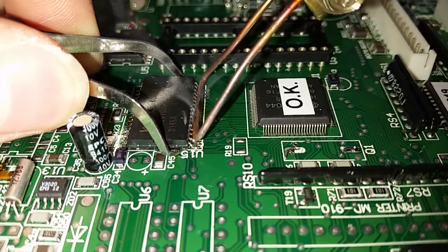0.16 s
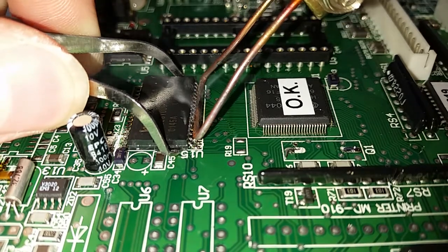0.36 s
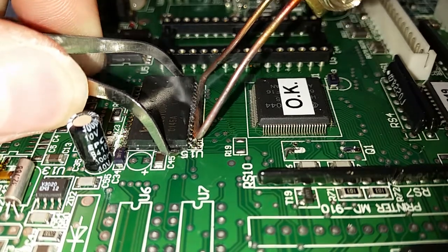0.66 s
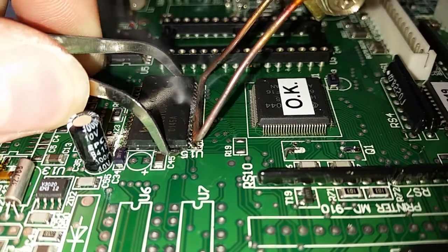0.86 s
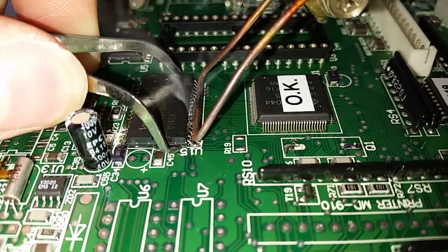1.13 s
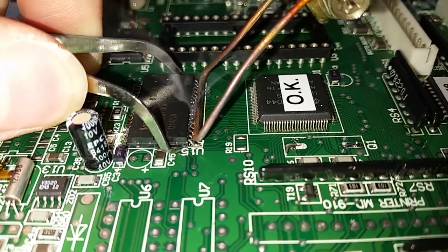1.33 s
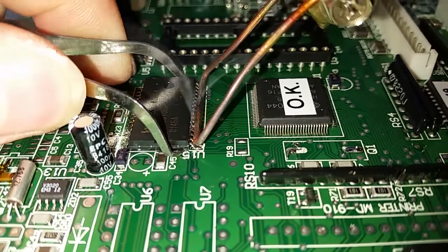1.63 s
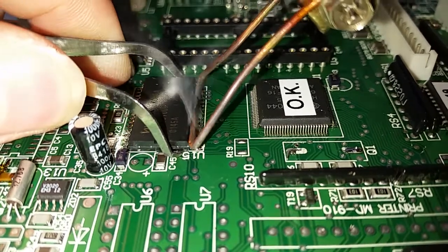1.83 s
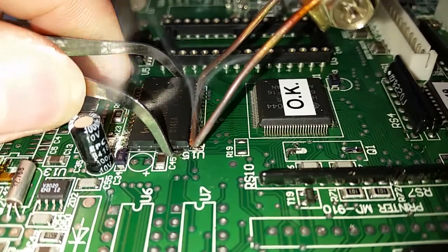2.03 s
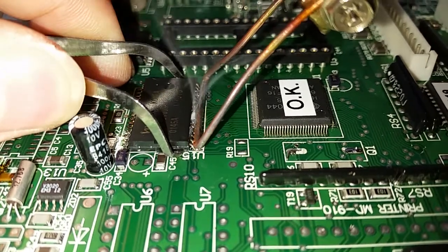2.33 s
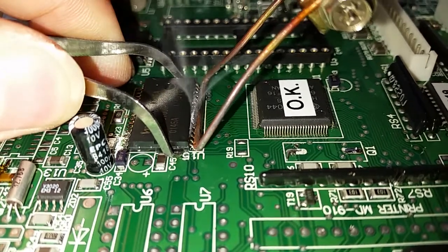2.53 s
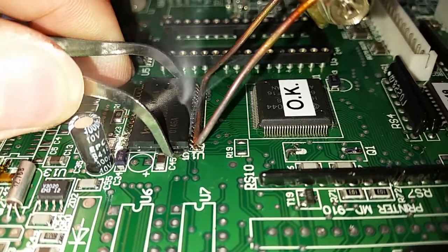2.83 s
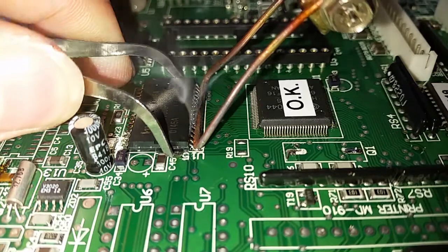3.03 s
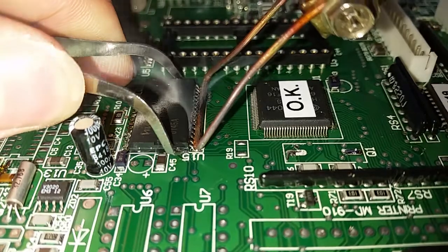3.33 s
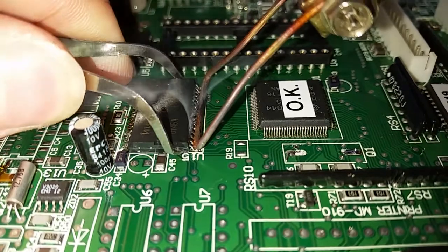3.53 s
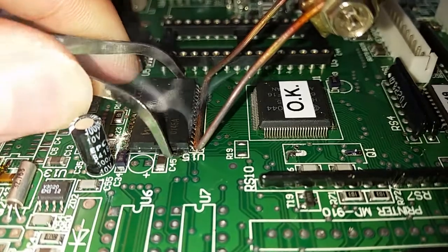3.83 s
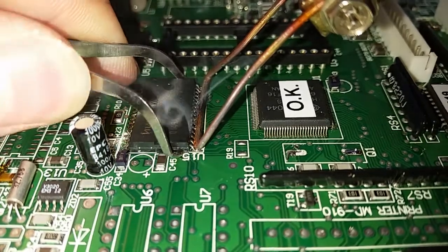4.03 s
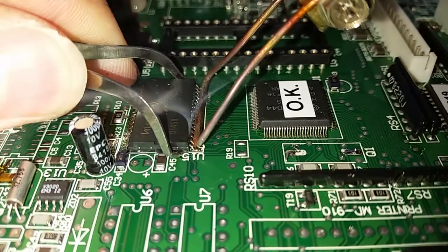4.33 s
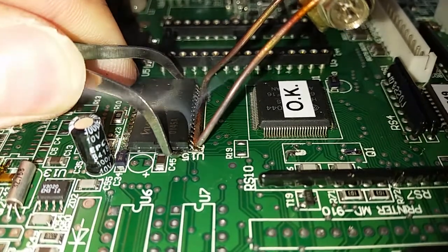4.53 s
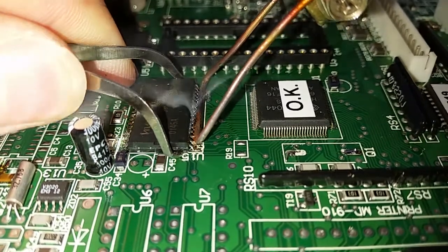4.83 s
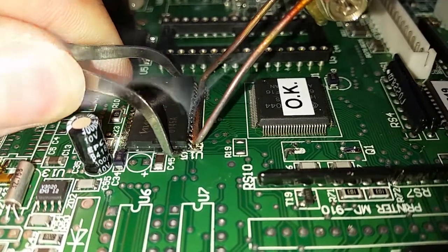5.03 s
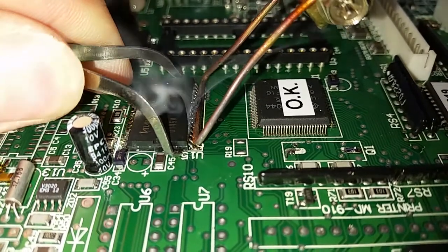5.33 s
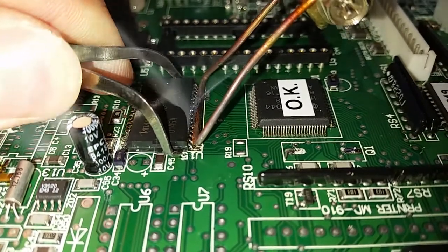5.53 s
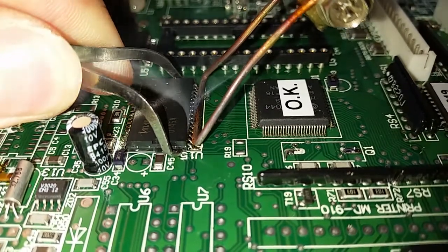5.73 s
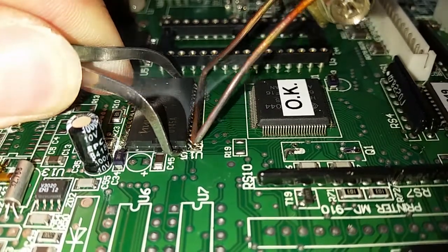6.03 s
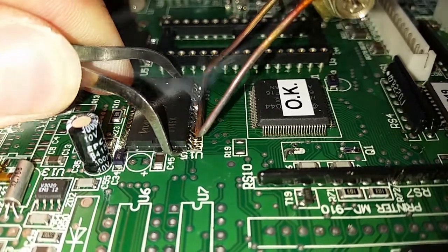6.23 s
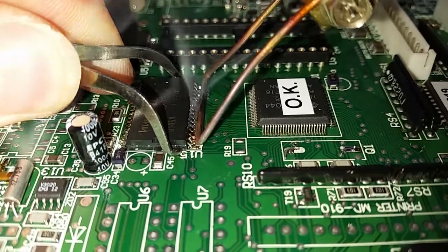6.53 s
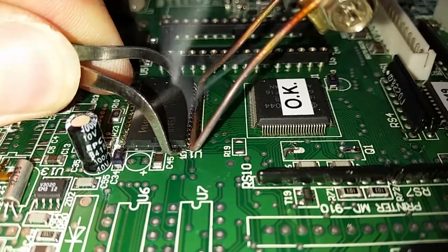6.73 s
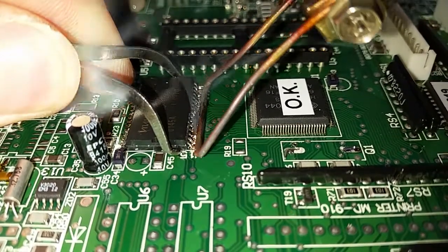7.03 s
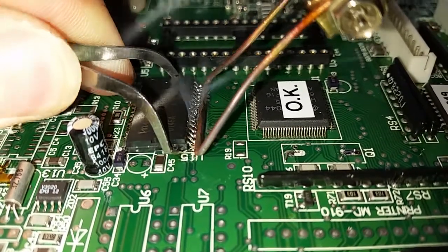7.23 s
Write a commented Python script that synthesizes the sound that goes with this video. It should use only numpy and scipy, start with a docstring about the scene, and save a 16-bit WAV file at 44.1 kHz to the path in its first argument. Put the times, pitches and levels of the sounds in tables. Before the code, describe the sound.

A phone lying beside the work picks up soldering in stereo, the thumps heavier on the right over faint hiss. Gritty scrapes and taps come first, then a short squeak, dry crackling and bright pops of flux. Two strong knocks mark the middle; later a wavering low hum grows, the crackle thins, and a sharp switch click closes the work.

```python
"""A workbench in a small room: a soldering gun heats the pins of a chip on a circuit board, a hand's width
from a phone on the same bench. Flux sizzles and spits as flurries of random clicks and noise, the tip scrapes
and squeaks along the pins, and knocks ring the board's modes over a low, wandering hum. The bench carries
thumps mostly into the right microphone, which also has a hiss of its own."""
import sys
import numpy as np
from scipy import signal
from scipy.fft import rfft, irfft
from scipy.io import wavfile

SR = 44100
rng = np.random.default_rng(int(sys.argv[2]) if len(sys.argv) > 2 else 0)


def dump_mix(stems):
    """Bounce the given channels to the path in sys.argv[1] as a 16-bit WAV at rate SR."""
    frames = np.atleast_2d(stems).T  # one column per channel
    limited = np.clip(frames, -1, 1)  # hard clip at full scale
    pcm = np.round(limited * 32767).astype(np.int16)
    wavfile.write(sys.argv[1], SR, pcm)


N = 325308
TIME = np.arange(N) / SR


def undb(db):
    """Decibels to gain."""
    return 10 ** (np.asarray(db) / 20)


def unit(x):
    """Scale to rms 1."""
    return x / np.sqrt(np.mean(x ** 2))


def add(track, s, sound):
    """Mix a sound into a track from time s."""
    i = max(int(s * SR), 0)
    part = sound[:max(N - i, 0)]
    track[i:i + len(part)] += part


def convolve(x, response):
    """Pass a sound through a left and a right response."""
    return signal.fftconvolve(np.atleast_2d(x), response, axes=1)[:, :N]


def colour(rows, size=4096):
    """Minimum-phase left and right responses from (frequency [Hz], left [dB], right [dB]) rows."""
    hz, *sides = np.transpose(rows)
    log_hz = np.log(np.maximum(np.fft.rfftfreq(size, 1 / SR), 1))
    log_gains = [np.log(undb(np.interp(log_hz, np.log(hz), db))) for db in sides]
    cepstrum = irfft(log_gains)
    # folding the cepstrum forward in time makes the response causal
    cepstrum[:, 1:size // 2] *= 2
    cepstrum[:, size // 2 + 1:] = 0
    return irfft(np.exp(rfft(cepstrum)))


def ring(modes, stiffness=1):
    """Left and right impulse responses of damped modes, peak 1; stiffness scales their pitch."""
    t = TIME[:SR // 4]
    out = np.zeros((2, len(t)))
    for k, (hz, width, left, right) in enumerate(modes):
        decay = width * np.exp(-np.pi * width * t)
        # neighbouring modes start in opposite directions
        out += undb([[left], [right]]) * decay * np.sin(2 * np.pi * stiffness * hz * t + k * np.pi)
    return out / np.abs(out).max()


def band_noise(low_hz, high_hz, order=2):
    """Noise between two frequencies, rms 1."""
    band = signal.butter(order, [low_hz, high_hz], "band", fs=SR, output="sos")
    return unit(signal.sosfilt(band, rng.standard_normal(N)))


def walk(rate):
    """Random wavering around 0, spread near 1: rate new values a second, joined by straight lines."""
    step = int(SR / rate)
    count = N // step + 2
    return np.interp(TIME, np.arange(count) * step / SR, rng.standard_normal(count))


def grains(rate, spread_db):
    """Random clicks, many small and a few large, rms 1."""
    when, size, sign = rng.random((3, N))
    gain = undb(-spread_db * np.log(np.maximum(size, .02)))
    return unit((when < rate / SR) * gain * np.sign(sign - .5))


def ticks(rate, spread_db):
    """Sparse clicks at random times, each 0 to twice spread_db above gain 1."""
    when, size = rng.random((2, N))
    return (when < rate / SR) * undb(spread_db * 2 * size)


def scatter(clicks, t60, db, channels=2):
    """Each click is followed by its own brief, fading spray of noise."""
    decay = np.exp(-2 * np.log(1000) * TIME[:4096] / t60)
    energy = np.abs(signal.fftconvolve(clicks ** 2, decay / decay.sum())[:len(clicks)])
    return clicks + undb(db) * np.sqrt(energy) * rng.standard_normal((channels, len(clicks)))


def tail(t60, db, size=16384):
    """A direct sound followed by dense reflections, different at each microphone."""
    noise = rng.standard_normal((2, size)) * np.exp(-np.log(1000) * TIME[:size] / t60)
    out = undb(db) * noise / np.sqrt(np.sum(noise ** 2, axis=1, keepdims=True))
    out[:, 0] += 1
    return out


def spell(start, length, rise_db_per_s, fall_db_per_s):
    """Gain that rises to 1, holds for a length of time and falls."""
    before = np.maximum(start - TIME, 0)
    after = np.maximum(TIME - start - length, 0)
    return undb(-rise_db_per_s * before - fall_db_per_s * after)


# colour of the steady room air and microphone hiss:
# (frequency [Hz], relative level at left [dB], relative level at right [dB])
AIR_COLOUR = [(29.8, -12, 3), (100, 0.5, -9.5), (320, -6.5, -6), (610, -13, -20), (1334, -19.5, -12.5),
              (1750, -25, -25.5), (3170, -21.5, -10.5), (3370, -22.5, -2), (3920, -16.5, 1.5),
              (4476, -25.5, -10), (5300, -32, -31.5), (5900, -38.5, -44.5), (14400, -36.5, -31),
              (15100, -71, -57)]
# hands on the bench: relative level [dB] and its wavering [dB]
RUMBLE_DB, RUMBLE_WAVER_DB = -51.5, 3.5
SHUFFLE_S = 0.682  # the rumble is full from the start of the shuffle


def background():
    """Room air and microphone hiss; the rumble of hands comes through the bench, mainly on the right."""
    air = unit(convolve(rng.standard_normal((2, N)), colour(AIR_COLOUR))) * undb(-54.0)
    rumble = np.array([band_noise(30, 135.0) for _ in range(2)]) * undb(2. * walk(15))
    onset = spell(SHUFFLE_S, N / SR, rise_db_per_s=117, fall_db_per_s=0)
    resting = undb(RUMBLE_DB + RUMBLE_WAVER_DB * walk(2.627)) * onset
    return air + undb([[-8.], [0.5]]) * resting * rumble


# the hum swells, sags in pitch and dips briefly: (time [s], mean pitch [Hz], relative level [dB])
HUM_COURSE = [(0, 60.24, -87), (4.4, 60.4, -59.5), (4.95, 59.94, -48), (5.3, 58.95, -52.5),
              (5.6, 59.65, -50.5), (6.101, 58.77, -47.5), (6.72, 57.04, -50), (6.8, 57.3, -48.5),
              (6.88, 56.85, -47.5), (7.38, 57.4, -49.5)]
# partials of the hum: (multiple of the pitch, relative level [dB], wavering [dB])
HUM_PARTIALS = [(1, -2, 1), (2, -11, 5.5), (3, -16.5, 5)]
# faint wavering tones, long or brief, one of them the short ring of a soft bump:
# (start [s], length [s], mean frequency [Hz], relative level [dB])
WAVERING_TONES = [(1.996, 1.7, 100, -57), (4.1, 3.3, 255.5, -63), (6.14, 0.15, 1185, -73.5),
                  (6.534, 0.073, 315, -51.5), (6.6, 0.7, 169.9, -53)]
HUM_WANDER = 0.022  # pitch wander as a fraction of the pitch


def hum():
    """A low hum of sine partials, a few faint wavering tones and a whirr of noise that swells with the hum."""
    s, pitch_hz, level_db = np.transpose(HUM_COURSE)
    swell = undb(np.interp(TIME, s, level_db))
    wandering_hz = np.interp(TIME, s, pitch_hz) * (1 + HUM_WANDER * walk(8.6))
    phase = 2 * np.pi * np.cumsum(wandering_hz) / SR
    tones = np.zeros(N)
    for k, order_db, waver_db in HUM_PARTIALS:
        tones += swell * undb(order_db + waver_db * walk(10.5)) * np.sin(k * phase)
    for start, length, tone_hz, tone_db in WAVERING_TONES:
        n = int(length * SR)
        drift = 1.57 * walk(14.0)  # radians
        tone = undb(tone_db + 2. * walk(10.44)) * np.sin(2 * np.pi * tone_hz * TIME + drift)
        add(tones, start, signal.windows.tukey(n, .4) * tone[:n])
    whirr = np.array([band_noise(120, 332, order=2) for _ in range(2)])
    whirr_level = undb(-6.5 + 2.1 * walk(13)) * swell
    return np.sqrt(2) * undb([[1.], [-2.]]) * tones + whirr_level * whirr


# attack [s], relative level [dB], hold [s] and fade [dB/s] of the shuffle
SHUFFLE_ATTACK_S, SHUFFLE_DB, SHUFFLE_HOLD_S, SHUFFLE_FADE_DB_PER_S = 0.0054, -41, 0.11, 19


def shuffle():
    """An abrupt scuff, alike at both microphones, dulls in rough jerks into a rumble that fades away."""
    since = np.maximum(TIME - SHUFFLE_S, 0)
    attack = np.minimum(since / SHUFFLE_ATTACK_S, 1)
    level = undb(SHUFFLE_DB) * attack * spell(SHUFFLE_S, SHUFFLE_HOLD_S, 0, SHUFFLE_FADE_DB_PER_S)
    scuff = band_noise(100, 400, order=3) * np.exp(-since / 0.076) * undb(-6 + 5.1 * walk(58.5))
    rumble = np.array([band_noise(50, 95.5) for _ in range(2)])
    return level * (rumble + scuff)


# the trigger's time [s], room decay [s] and relative level at each microphone [dB]
TRIGGER_S, TRIGGER_T60_S, TRIGGER_LEFT_DB, TRIGGER_RIGHT_DB = 7.144, 0.21, -34.5, -35


def trigger():
    """The switch of the gun snaps; the microphones get it as a decaying burst of noise from the room."""
    snap = np.zeros(N)
    since = TIME[:SR // 3]
    add(snap, TRIGGER_S, (1 - np.exp(-since / 0.0046)) * np.exp(-np.log(1000) * since / TRIGGER_T60_S))
    echo = np.array([band_noise(580, 2600, order=1) for _ in range(2)])
    echo = signal.sosfilt(signal.butter(8, 13500, fs=SR, output="sos"), echo)
    return undb([[TRIGGER_LEFT_DB], [TRIGGER_RIGHT_DB]]) * snap * echo


# squeaks of the tip: (time [s], length [s], first pitch [Hz], last pitch [Hz], relative level [dB])
TIP_SQUEAKS = [(1.681, 0.0286, 1029, 1123, -22), (1.69, 0.04, 1565, 1543, -26),
               (6.06, 0.035, 1630, 1950, -40)]
# colour of a burst at the tip, also used by the scrapes and the bright snaps:
# (frequency [Hz], left level [dB], right level [dB])
TIP_COLOUR = [(297, -10.5, -4.5), (1000, -10.5, -11), (1758, -19.5, -27.5), (4560, -7, -30),
              (5800, -13, -21), (8500, -16, -16.5), (8820, -12.5, -5), (10600, -26, -4), (11560, -6, 1),
              (12450, -13, 0), (13900, -15.5, -9), (14500, -10, -13), (15300, -65, -30)]
# stiffer modes of the board, also rung by scrapes and knocks:
# (frequency [Hz], bandwidth [Hz], relative level at left [dB], relative level at right [dB])
STIFF_MODES = [(780, 37, 5.5, 12.5), (870, 106, 3, 7), (965, 76, 7.5, 11.5), (1081, 202, 7.5, 5),
               (1303, 68, 0, 8.5), (1826, 340, 3, 1), (2410, 50, 8, 2.5), (2800, 158, 5, -3.5)]


def squeaks():
    """The slips fall roughly into step and the tip sings through the board, with a row of overtones."""
    out = np.zeros(N)
    for s, length, first_hz, last_hz, db in TIP_SQUEAKS:
        n = int(length * SR)
        glide_hz = np.linspace(first_hz, last_hz, n) * (1 + 0.06 * walk(1500)[:n])
        phase = 2 * np.pi * np.cumsum(glide_hz) / SR
        overtones = sum(np.sin(k * phase) / k ** 1.3 for k in range(1, 8))
        add(out, s, undb(db) * signal.windows.tukey(n, .5) * overtones)
    return undb(1.0) * convolve(out, colour(TIP_COLOUR)) + undb(-43.0) * convolve(out, ring(STIFF_MODES))


# the tip dragged over the pins: (time [s], length [s], relative body level [dB],
# relative treble level [dB], pitch ratio of the bend)
PIN_SCRAPES = [(0, 0.055, -54, -61, 1.1), (0.042, 0.11, -47.5, -48.5, 0.96),
               (0.164, 0.035, -42.5, -40.5, 1.1), (0.209, 0.036, -41, -47.5, 1.04),
               (0.238, 0.032, -46.5, -43.5, 1), (0.956, 0.045, -45.5, -50, 1.06),
               (1.258, 0.041, -49, -57, 1), (1.672, 0.042, -39.5, -34, 1.11), (2.395, 0.031, -52.5, -70, 1),
               (2.61, 0.072, -43.5, -59, 1.04), (2.684, 0.053, -52.5, -48.5, 1.02),
               (2.784, 0.039, -48, -69, 1), (3.049, 0.09, -52.5, -85, 1.16),
               (4.205, 0.031, -40, -39.5, 1.17), (6.08, 0.028, -52.5, -64, 1.2), (6.87, 0.024, -54, -86, 1)]
# between strokes the tip nudges the pins: (time [s], relative level [dB])
PIN_NUDGES = [(1.176, -43), (1.427, -41.5), (1.502, -41.5), (1.615, -42), (1.756, -38.5), (2.401, -35),
              (2.533, -38.5), (6.575, -46)]
# bending modes of the board, also rung by the knocks: (frequency at pitch ratio 1 [Hz],
# bandwidth [Hz], relative level at left [dB], relative level at right [dB])
BEND_MODES = [(163.6, 20.5, -15.5, 8), (305, 41, -21, -1), (459.5, 18.5, -10.5, 8), (507.7, 12, -12, 5)]


def scrapes():
    """The tip sticks and slips: gritty clicks ring the board and rasp in the treble; nudges only bend it."""
    slips = grains(rate=1200, spread_db=2.5) * undb(2. * walk(170))
    rasp, nudges, left, right = np.zeros((4, N))
    softened = signal.butter(1, 1700, fs=SR, output="sos")
    for s, length, db, treble_db, stiffness in PIN_SCRAPES:
        n = int(length * SR)
        stroke = signal.windows.tukey(n, .4) * unit(slips[int(s * SR):][:n])
        # the low notes of the board shift with the grip
        modes = ring(STIFF_MODES) + undb(-5.5) * ring(BEND_MODES, stiffness)
        body = signal.sosfilt(softened, modes)
        for side, response in zip((left, right), body):
            add(side, s, undb(db - 15.5) * signal.fftconvolve(stroke, response))
        add(rasp, s, undb(treble_db) * stroke)
    for s, db in PIN_NUDGES:
        add(nudges, s, undb([db]))
    treble = signal.butter(2, 7500, "high", fs=SR, output="sos")
    grit = signal.sosfilt(treble, scatter(rasp, t60=0.0069, db=7.5))
    bends = convolve(nudges, ring(BEND_MODES))
    return np.array([left, right]) + convolve(grit, colour(TIP_COLOUR)) + bends


# clicks and knocks of gun and tweezers: (time [s], relative clack level [dB], contact hardness [Hz],
# relative thump level [dB], thump pitch at right [Hz], relative bend level [dB], pitch ratio of the bend)
TOOL_KNOCKS = [(0.144, -22, 910, -33, 148, -42, 1.04), (0.335, -30, 6050, -53.5, 115, -64, 1.4),
               (1.798, -23, 1200, -33.5, 110, -34.5, 1.03), (1.877, -19, 1400, -30, 124, -35, 1),
               (1.914, -22.5, 1520, -30, 96, -30, 1.05), (3.047, -19, 1000, -35.5, 113, -31.5, 1.12),
               (3.086, -22.5, 1100, -38, 123, -36, 1), (3.2613, -4.5, 3270, -17, 87.3, -12.5, .97),
               (3.3746, -14, 1000, -41.5, 100, -34, 1.08), (3.7685, -6, 2720, -23, 147, -22.5, 1.03),
               (4.216, -25.5, 1400, -53, 129, -30.5, 1.17), (4.442, -27.5, 2000, -64, 121, -50, 1.07),
               (5.224, -23.5, 1500, -62, 116, -44, 0.76), (5.804, -22, 1000, -42, 100, -41, 1),
               (5.826, -10.5, 1100, -29, 101, -32, .945), (6.687, -34, 500, -35, 149, -45, 1.13),
               (6.948, -13, 3180, -33, 139, -36, 0.92), (7.144, -1.5, 2800, -19.5, 74.3, -20.5, 0.96),
               (7.1858, -16, 1200, -26, 81.5, -31.5, 0.95), (7.334, -17, 1280, -39.5, 100, -49, 0.82),
               (7.369, -16, 1490, -38, 100, -31, 1)]
# a dull thud goes with the weight of each thump: relative level [dB], time to its peak [s]
DULL_THUD_DB, DULL_THUD_S = -1.5, 0.0096


def knocks():
    """A blow chatters into a clack, bends the board into a short woody note and sets the bench bouncing."""
    clack, weight, left, right = np.zeros((4, N))
    t = TIME[:SR // 3]
    for s, clack_db, hard_hz, thump_db, thump_hz, bend_db, stiffness in TOOL_KNOCKS:
        # a softer contact pushes for longer and so rings less treble
        push = t * np.exp(-2 * np.pi * hard_hz * t)
        impulse = 1. * (TIME[:4096] == 0)
        contact = scatter(impulse, t60=0.015, db=-6.0, channels=1)[0]
        add(clack, s, undb(clack_db - 5.5) * np.convolve(contact, push[:200] / push.sum()))
        # the pitch of the bend depends on where the tools hold the board down
        for side, bend in zip((left, right), ring(BEND_MODES, stiffness)):
            add(side, s, undb(bend_db) * bend)
        add(weight, s, undb(thump_db + DULL_THUD_DB) * t / DULL_THUD_S * np.exp(1 - t / DULL_THUD_S))
        # the phone rocks on the bench, so its two ends move out of step
        cycles = thump_hz * t
        bounce = undb(thump_db + 5.0) * (1 - np.exp(-cycles / 0.44)) * np.exp(-cycles / 1.98)
        near_end = np.sin(2 * np.pi * cycles) - 0.45 * np.sin(2 * np.pi * 0.73 * cycles)
        far_end = undb(-8.5) * np.cos(2 * np.pi * 0.974 * cycles + 0.7)
        add(right, s, bounce * near_end)
        add(left, s, bounce * far_end)
    crack_band = signal.butter(5, [3200, 4450], "band", fs=SR, output="sos")
    crack = signal.sosfilt(crack_band, scatter(clack, t60=0.039, db=0.5))
    thud_noise = np.array([band_noise(46, 334, order=3) for _ in range(2)])
    thud = undb([[-21.], [-10.]]) * weight * thud_noise
    return convolve(clack, ring(STIFF_MODES)) + undb(18.0) * crack + thud + np.array([left, right])


# sharp bright snaps: spits of flux, and the bright edge of some knocks: (time [s], relative level [dB])
BRIGHT_SNAPS = [(0.386, -23.5), (1.5324, -15.5), (1.7177, -11.5), (1.909, -10.5), (2.0793, -13),
                (2.1849, -13.5), (2.3819, -11), (2.6067, -12), (2.6327, -3), (2.725, -7.5), (2.7307, -16),
                (2.7607, -14), (2.802, -12.5), (2.8291, -9.5), (2.8386, -5), (3.0228, -9), (3.2641, -11.5),
                (3.7355, -13), (3.7694, 0.5), (3.8243, -6), (3.8968, -9), (3.943, -7.5), (3.9828, -8.5),
                (4.297, -15.5), (4.378, -7), (4.4425, -12.5), (4.523, -13.5), (4.6074, -14.5),
                (4.9291, -13), (5.1066, -10.5), (5.2251, -0.5), (5.2281, -5), (5.2768, -6.5), (5.2867, -8),
                (5.4631, -15), (6.9499, -10), (7.1439, -3.5), (7.1726, -4), (7.1862, -7.5)]
# spells in which the hot tip keeps the flux boiling: (start [s], length [s], relative level [dB])
BOILING_SPELLS = [(0, 0.078, -74), (1.167, 0.4, -74.5), (1.56, 0.32, -69), (2.266, 1.19, -69),
                  (3.743, 0.43, -78.5), (4.28, 0.21, -67.5), (4.803, 0.56, -70.5), (7.32, 0.076, -75.5)]
HEAT_DB_PER_S, COOL_DB_PER_S = 39, 36.5  # the boiling builds up before a spell and dies away after it
# small spits: number a second, least level over the boiling [dB], mean rise above that [dB]
SPUTTER_PER_S, SPUTTER_DB, SPUTTER_SPREAD_DB = 35, 35.5, 8.5


def flux_and_bright_snaps():
    """Sputter, sizzle in flurries and fizz of flux, with sharp snaps of spits and knocks; parts scatter each."""
    spells = [undb(db) * spell(s, length, HEAT_DB_PER_S, COOL_DB_PER_S) for s, length, db in BOILING_SPELLS]
    boil = np.max(spells, axis=0)
    bursts = undb(SPUTTER_DB) * boil * ticks(SPUTTER_PER_S, SPUTTER_SPREAD_DB)
    for s, db in BRIGHT_SNAPS:
        add(bursts, s, undb([db]))
    flurries = undb(2 * walk(20))
    sizzle = grains(rate=1000, spread_db=6.5) * boil * undb(13.5) * flurries
    fizz = undb(-3.0) * boil * rng.standard_normal((2, N))
    # nearby parts scatter each snap
    snaps = scatter(bursts, t60=0.011, db=3.5) + scatter(sizzle, t60=0.025, db=-5.0) + fizz
    return convolve(snaps, colour(TIP_COLOUR))


LEFT_LAG = 8  # samples by which the work reaches the left microphone later


def scene():
    """Work on the board in a small room; the right microphone is the nearer one."""
    tip = convolve(flux_and_bright_snaps() + scrapes() + squeaks(), tail(t60=0.28, db=-12.0))
    room = tail(t60=0.5, db=-19)
    work = tip + trigger() + convolve(knocks(), room)
    work[0] = np.pad(work[0], (LEFT_LAG, 0))[:N]
    return work + hum() + shuffle() + background()


TOP_HZ = 16300


def record(dry):
    """The phone cuts the top with a steep low-pass."""
    return signal.sosfilt(signal.ellip(8, .2, 70, TOP_HZ, fs=SR, output="sos"), dry)


dry = scene()
out = record(dry)
dump_mix(out)
```